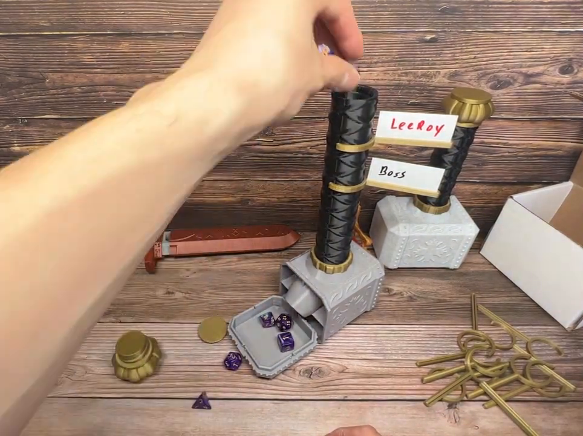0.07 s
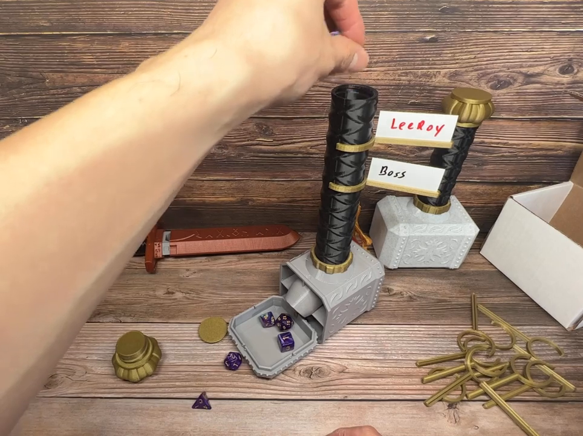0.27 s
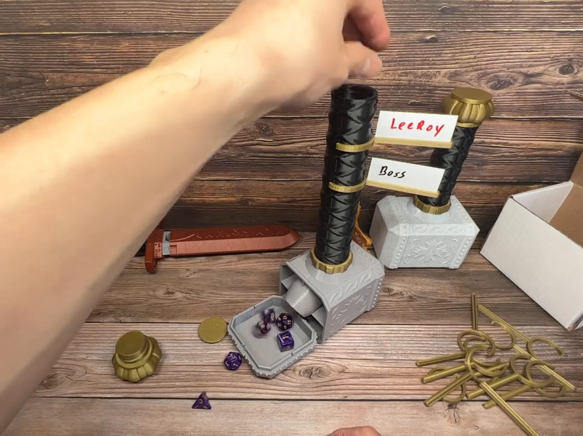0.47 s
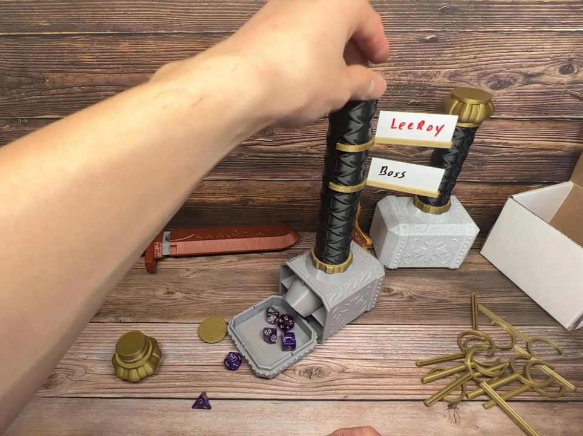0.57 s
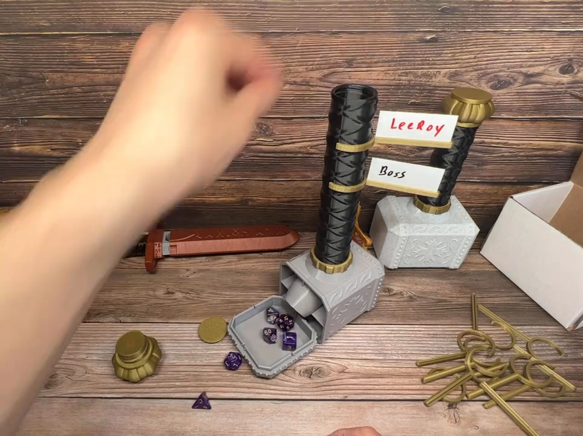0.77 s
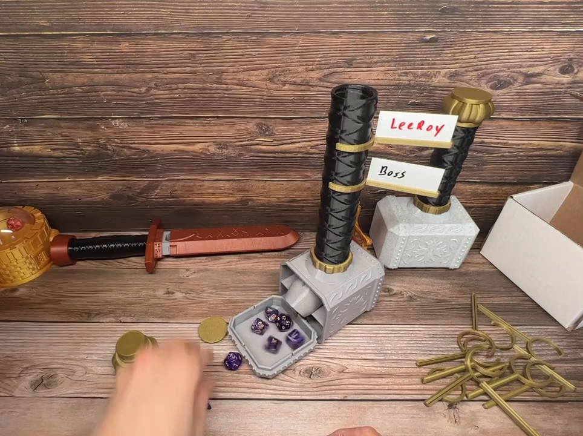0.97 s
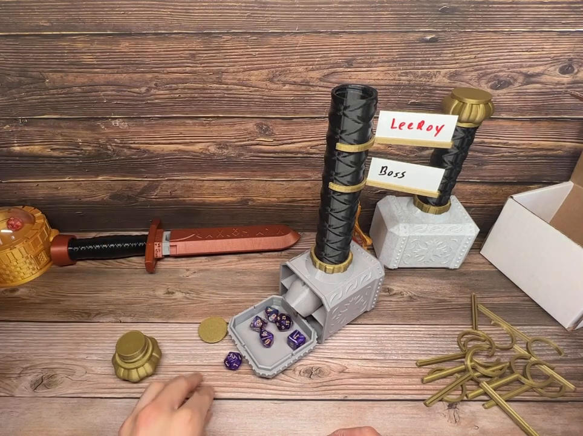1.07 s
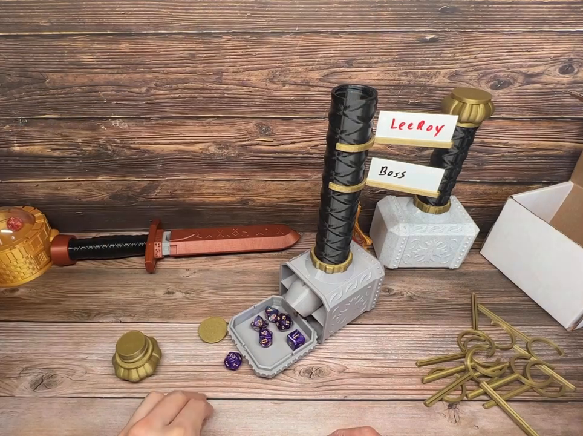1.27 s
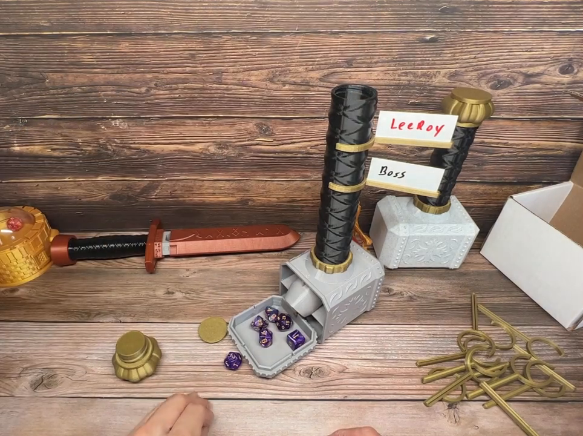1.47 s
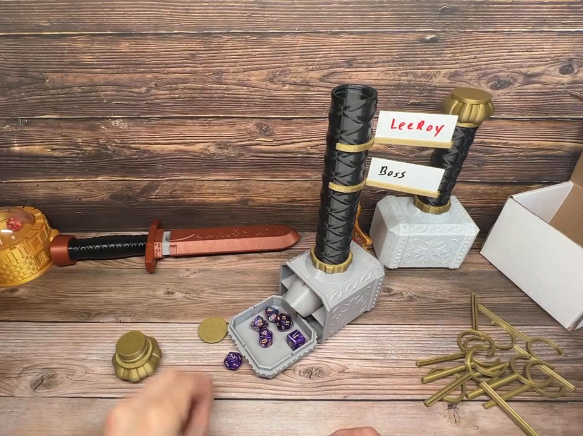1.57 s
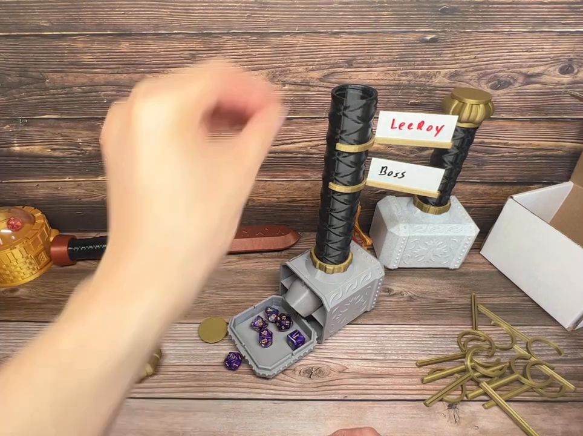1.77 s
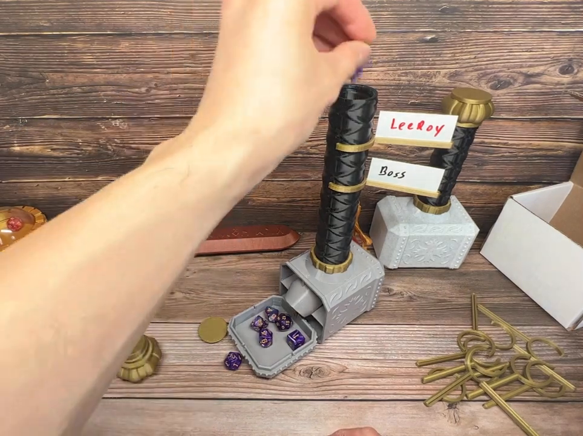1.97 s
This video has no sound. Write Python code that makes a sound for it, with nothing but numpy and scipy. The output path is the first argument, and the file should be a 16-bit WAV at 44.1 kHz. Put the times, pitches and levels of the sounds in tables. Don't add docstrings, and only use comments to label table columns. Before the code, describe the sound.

Hard plastic dice drop through a hollow plastic tower: a light first rattle, then two louder sharp clatters, each bouncing and tumbling into the tray; faint motor hum, small furnished room, close stereo microphone.

```python
import sys
import numpy as np
from scipy import signal
from scipy.fft import rfft, irfft, next_fast_len
from scipy.io import wavfile
from scipy.ndimage import uniform_filter1d, map_coordinates

SR = 44100
rng = np.random.default_rng(int(sys.argv[2]) if len(sys.argv) > 2 else 0)


def put_to_file(sound):
    columns = np.atleast_2d(sound).T
    safe = np.clip(columns, -1, 1)
    whole_steps = np.round(safe * 32767)
    wavfile.write(sys.argv[1], SR, whole_steps.astype(np.int16))


def gain_from_db(level_db):
    decades = np.asarray(level_db, float) / 20
    return 10 ** decades


N = 88200


def unit(x):
    return x / np.sqrt(np.mean(x ** 2) + 1e-20)


def peak(x):
    return x / np.abs(x).max()


def along(points, hz):
    f, value = np.transpose(points)
    return np.interp(np.log(hz + 1), np.log(f + 1), value)


def stretches(curves):
    t = np.arange(N) / SR
    gain = sum(gain_from_db(np.interp(t, *np.transpose(curve), left=-150, right=-150)) for curve in curves)
    return uniform_filter1d(gain, size=900, mode="nearest")


def wobble(rate):
    knots = rng.standard_normal(int(N * rate / SR) + 4)
    return map_coordinates(knots, [np.arange(N) * rate / SR])


def filtered(x, response):
    m = next_fast_len(x.shape[-1] + 8192)
    return irfft(rfft(x, m) * response(np.fft.rfftfreq(m, 1 / SR)), m)[..., :x.shape[-1]]


def resonance(f, hz, width_hz):
    return 1j * f * width_hz / (hz * hz - f * f + 1j * f * width_hz)


def body(modes):
    return lambda f: sum((-1) ** k * gain_from_db(db) * resonance(f, hz, width)
                         for k, (hz, width, db) in enumerate(modes))


# pitch_hz, likeness (0 to 1)
LIKENESS = [(150, 0.92), (400, 0.36), (1000, 0), (4000, 0.0044)]


def rush(spectrum):
    def mid_side_gain(hz):
        turn = np.arccos(np.clip(along(LIKENESS, hz), -1, 1)) / 2
        return gain_from_db(along(spectrum, hz)) * [np.cos(turn), np.sin(turn)]

    mid, side = filtered(rng.standard_normal((2, N)), mid_side_gain)
    return unit(np.array([mid + side, mid - side]))


# pitch_hz, level_db (per Hz)
RUMBLE_COLOUR = [(15, -35), (25, -11), (54, 6), (75, -16), (194, 1), (224, -10), (460, -10.5), (600, -35.5),
                 (780, -57), (1320, -120)]
# pitch_hz, level_db (per Hz)
AIR_COLOUR = [(400, -34.5), (550, 4.5), (1000, -2), (2200, -10), (9000, -21), (12500, -48), (16000, -63.5)]


def room_noise():
    return gain_from_db(-53.5) * rush(RUMBLE_COLOUR) + gain_from_db(-63) * rush(AIR_COLOUR)


# pitch_hz, width_hz, level_db
MOTOR_TONES = [(47, 5.8, 1.5), (144.6, 23, -1), (179, 18, 1.5), (282, 33, -8.5), (479, 10, -4.5)]


def motor():
    def tones(f):
        return np.abs(sum(body([tone])(f) ** 2 * gain_from_db(-tone[2]) for tone in MOTOR_TONES))

    return gain_from_db(-55.5) * unit(filtered(rng.standard_normal(N), tones))


# time_s, level_db
SLEEVE_MOVES = [
    [(0, -69), (.17, -71.5), (.36, -59)],
    [(.7, -88), (.83, -60.5)],
    [(1.4, -99), (1.53, -87.5), (1.58, -70), (1.63, -90.5), (1.74, -83), (1.79, -69.5), (1.9, -68.5),
     (2, -70.5)],
]
# pitch_hz, level_db (per Hz)
CLOTH_COLOUR = [(1200, -14.5), (2000, -6), (7000, -5), (11000, -20), (14000, -54.5)]


def sleeve():
    return stretches(SLEEVE_MOVES) * gain_from_db(5.0 + 1.2 * wobble(34)) * rush(CLOTH_COLOUR)


def hand():
    start_s, soft_s, pitch_hz = 1.165, 0.016, 51.6
    u = np.maximum(np.arange(N) / SR - start_s, 0) / soft_s
    return gain_from_db(-43) * u * np.exp(1 - u) * np.sin(2 * np.pi * pitch_hz * soft_s * u)


# pitch_hz, die_away_s (to -60 dB)
LINGER = [(200, 0.24), (1500, 0.34), (5000, 0.16), (9000, 0.23), (12000, 0.087)]
# delay_s, level_db
NEAR_ECHOES = [
    (.0037, -24),
    (.0082, -20),
    (.0121, -32.5),
]
TAIL_TIMES_S = [0, .19, .3, .38, .45, .48, .56, .84, .875, .95, .97, .99, 1.06, 1.13, 2]


def room(x):
    out = np.zeros((2, N + SR))
    edges = np.round(np.array(TAIL_TIMES_S) * SR).astype(int)
    for start, end in zip(edges[:-1], edges[1:]):
        hz, t, z = signal.stft(rng.standard_normal((2, SR // 2)), SR, nperseg=256)
        apart = (hz / (hz + 200))[:, None] ** 2
        z = np.array([z[0] + apart * z[1], z[0] - apart * z[1]]) / np.sqrt(1 + apart ** 2)
        fade = gain_from_db(-60 * t / along(LINGER, hz)[:, None])
        tail = signal.istft(z * fade, SR, nperseg=256)[1]
        tail = gain_from_db(-10.5) * np.pad(tail / np.linalg.norm(tail[0]), ((0, 0), (150, 0)))
        for k, (delay_s, db) in enumerate(NEAR_ECHOES):
            left = round(delay_s * SR)
            tail[[0, 1], [left, left + (-1) ** k * 9]] += gain_from_db(db)
        wet = signal.fftconvolve(x.mean(0)[None, start:end], tail, axes=1)
        out[:, start:start + wet.shape[1]] += wet
    return out[:, :N]


# time_s, level_db
SKIDS = [
    [(.375, -31), (.42, -35), (.47, -40)],
    [(.835, -40), (.9, -43), (.96, -38.5)],
]
# time_s, level_db
TUMBLES = [
    [(.49, -43), (.55, -44), (.6, -42), (.655, -44), (.69, -58), (.76, -68)],
    [(.98, -28), (1.05, -46.5), (1.12, -38), (1.17, -44.5), (1.22, -62), (1.3, -68.5)],
]
# pitch_hz, level_db (per Hz)
TUMBLE_COLOUR = [(290, -30.5), (500, -1), (1080, 5), (1280, -10), (1770, 3), (3200, -5), (3810, -5),
                 (6230, -2), (16000, -49)]
# pitch_hz, width_hz, level_db
TRAY_SHELL = [(1495, 100, -3), (1790, 130, -5), (2170, 110, -5.5), (2420, 58, -3), (2800, 200, -8),
              (3200, 180, -1), (3600, 250, -5.5)]
# pitch_hz, width_hz, level_db
TRAY_AIR = [(640, 76, -1.5), (870, 200, 6.5), (1139, 82, 1)]
# pitch_hz, width_hz, level_db
TRAY_BOOM = [(128, 38, -12), (201, 24, 5.5), (292, 52, 0.5), (416, 64, -6)]


def rolling():
    size = gain_from_db(np.minimum(4 * rng.exponential(size=N), 11))
    happens = rng.random(N) < 1200 / SR
    contacts = size * happens * np.sign(rng.standard_normal(N))
    grains = unit(contacts * gain_from_db(1.9 * wobble(78))) + 0.54 * rng.standard_normal((2, N))

    def tray(f):
        ringing = 1 + 0.23 * body(TRAY_SHELL)(f) + 0.49 * body(TRAY_AIR)(f)
        return gain_from_db(along(TUMBLE_COLOUR, f)) * ringing

    def baffle(f):
        return body([(5000, 2500, 0), (2300, 1400, -2.5), (1100, 350, -3)])(f) / (1 + (f / 7000) ** 4)

    tone = unit(filtered(grains, tray))
    rumble = unit(filtered(grains[0], lambda f: body(TRAY_BOOM)(f) / (1 + 1j * f / 450) ** 2))
    skid = unit(filtered(grains, baffle))
    return (tone + gain_from_db(-6.5) * rumble) * stretches(TUMBLES) + skid * stretches(SKIDS)


# pitch_hz, level_db (per Hz)
DIE_CLICK = [(2060, -18.5), (3500, -11.5), (4340, -1.5), (6400, -0.5), (10300, -9.5), (11800, -8),
             (13800, -33.5), (15400, -15), (16500, -33.5)]


def knocks(hits, walls, hollow, table, scrape_s, width_hz, rough, ring_db, click_db, thud_db, boom_db):
    click_first_s, stiff_hz = .0007, 1300
    edge_noise = .06
    out, t = np.zeros((2, N + SR)), np.arange(SR // 5) / SR
    sides = np.array([[1], [-1]])

    def late(x):
        return np.roll(x, round(click_first_s * SR), axis=-1)

    def stiff(f):
        return (f * f / (f * f - stiff_hz ** 2 - 1j * f * stiff_hz)) ** 2

    def heard(modes, luck):
        def response(f):
            total = 0
            for k, ((hz, width, db), (tune, gain, lean, phase)) in enumerate(zip(modes, luck)):
                mode = body([(hz * (1 + .006 * tune), width, db + 1.5 * gain)])(f) * (-1) ** k
                total = total + mode * gain_from_db(2.3 * lean * sides) * np.exp(.2j * phase * sides)
            return total
        return response

    for start_s, db, hz, bright_db, low_db in hits:
        chance, luck = rng.standard_normal((3, len(t))), rng.standard_normal((14, 4))
        scrape = np.exp(-(t / scrape_s) ** 4) + .12 * np.exp(-t / .006)
        shape = (1 - np.exp(-t / 0.00095)) * scrape
        swing = shape * (np.sin(2 * np.pi * hz * t) + rough * chance[0])
        wall = peak(filtered(late(swing), lambda f: body([(hz, width_hz, 0)])(f) ** 2 * stiff(f)))
        blow = (t == 0) + edge_noise * rough * chance[0] * shape
        shell = peak(filtered(
            late(blow), lambda f: heard(walls, luck)(f) * body([(hz, 1700, 0)])(f) * stiff(f)))
        fizz = chance[1:] * shape * np.minimum(t / 0.0056, 1)
        click = peak(filtered(fizz, lambda f: gain_from_db(along(DIE_CLICK, f))))
        thud = peak(filtered(late(shape * np.exp(-t / 0.00052)), heard(hollow, luck)))
        push = np.roll(t * np.exp(-t / 0.00046), round(.003 * SR))
        boom = peak(filtered(push, body(table)))
        hit = peak(wall + gain_from_db(ring_db) * shell)
        hit = hit + gain_from_db(low_db + thud_db) * thud + gain_from_db(boom_db) * boom
        hit = hit + gain_from_db(bright_db + click_db) * (click[0] + 0.3 * click[1] * sides)
        start = round((start_s - click_first_s) * SR)
        out[:, start:start + len(t)] += gain_from_db(db) * hit
    return out[:, :N]


# start_s, level_db (peak), pitch_hz (wall), click_db, thud_db (both over the knock)
TRAY_BOUNCES = [(0.4718, -11, 2170, -12.5, -6.5), (0.4852, -15, 1800, -9.5, -13),
                (0.4862, -6, 3190, -13, -15), (0.5472, -30.5, 4000, 2.5, -30),
                (0.5771, -22, 4970, -8.5, -17), (0.5962, -28.5, 3270, -6.5, -2),
                (0.6258, -31, 1810, -7, -22.5), (0.6436, -31, 1680, -11, -28),
                (0.9636, -9.5, 3090, -12.5, -6.5), (0.9752, -10, 2587, -12, -18),
                (0.9958, -16.5, 2430, -9, -47), (1.0359, -35, 1540, 0.5, -88), (1.074, -24.5, 2570, -8, -7),
                (1.0771, -24, 3320, -7, -3), (1.1045, -47, 2080, -12, -20), (1.1172, -30, 1800, -9.5, -3),
                (1.1372, -47, 3200, -30, -20), (1.1815, -37.5, 1670, -26, -15),
                (1.1297, -32.5, 2290, -35, -11), (1.1466, -27, 2440, -17, -6.5),
                (1.1584, -31.5, 1480, -12, -8.5)]
LAST_TICK = [
    (1.2072, -40.5, 1480, -31.5, -9.5),
]
# pitch_hz, width_hz, level_db
TICK_SHELL = [(1466, 31, -5), (1820, 34, 0)]
# pitch_hz, width_hz, level_db
TICK_AIR = [(1125, 26, 0)]


def landing():
    bounces = knocks(TRAY_BOUNCES, TRAY_SHELL, TRAY_AIR, TRAY_BOOM, scrape_s=0.005, width_hz=1300,
                     rough=1.15, ring_db=4, click_db=9.0, thud_db=-1.0, boom_db=-23.5)
    tick = knocks(LAST_TICK, TICK_SHELL, TICK_AIR, TRAY_BOOM, scrape_s=0.0061, width_hz=450,
                  rough=.1, ring_db=1, click_db=5, thud_db=3.5, boom_db=-25)
    return bounces + tick


# start_s, level_db, pitch_hz, click_db, thud_db
FIRST_DIE = [(0.1768, -19.5, 2800, -20.5, -10.5), (0.1982, -18, 2287, -15.5, -15.5),
             (0.2012, -14, 1850, -28.5, -16), (0.2134, -19.5, 1800, -25.5, -11),
             (0.2262, -22, 1800, -15, -15.5), (0.2317, -33.5, 1800, -30, -15.5),
             (0.2770, -25, 2100, -10, -17)]
# start_s, level_db, pitch_hz, click_db, thud_db
SECOND_DIE = [(0.3691, -9, 3494, -19, -41), (0.3765, -19, 1800, -23.5, -30),
              (0.3961, -15.5, 2440, -36, -14), (0.4070, -16, 2470, -28.5, -22),
              (0.4136, -23, 1875, -8.5, -12)]
# start_s, level_db, pitch_hz, click_db, thud_db
LAST_DIE = [(0.8318, -9.5, 1870, -18.5, -29.5), (0.8371, -19.5, 1800, -30, -16.5),
            (0.8474, -15, 2550, -28.5, -18), (0.8527, -17.5, 2320, -30, -10.5),
            (0.8598, -8.5, 2280, -16, -20.5), (0.8622, -8.5, 1800, -13, -16),
            (0.8670, -13.5, 2300, -27.5, -12), (0.8802, -11.5, 2930, -5.5, -19),
            (0.8838, -12.5, 3240, -18, -9), (0.8903, -16.5, 2310, -16.5, -13.5),
            (0.9167, -14, 1765, -4, -15)]
# start_s, level_db, pitch_hz, click_db, thud_db
MOUTH_BLOWS = [
    (0.3665, -0.12, 1869, -15, -38),
    (0.8271, 0.58, 1945, -24.5, -28.5),
]
# start_s, level_db, pitch_hz, click_db, thud_db
BAFFLE_BLOW = [
    (0.3853, -1.1, 2616, -29, -25),
]
# pitch_hz, width_hz, level_db
LIGHT_SHELL = [(1510, 130, -7), (1817, 50, 1), (2080, 46, -5.5), (2430, 85, -4.5), (2800, 150, -7),
               (3320, 200, -10.5)]
# pitch_hz, width_hz, level_db
TOWER_SHELL = [(1480, 120, 2.5), (1800, 44, -1.5), (2050, 91, -4), (2470, 390, -5), (2620, 54, 0),
               (3200, 240, -6.5), (3222, 100, -9), (3620, 420, -10.5)]
# pitch_hz, width_hz, level_db
MOUTH_SHELL = [(1480, 140, -3), (1800, 100, 4.5), (2194, 170, -1.5), (2412, 150, -2), (2960, 120, -2),
               (3364, 150, 0.5), (3560, 71, -8)]
# pitch_hz, width_hz, level_db
FIRST_AIR = [(730, 90, -1), (1100, 39, -3)]
# pitch_hz, width_hz, level_db
TOWER_AIR = [(669, 16, 17), (726, 83, -1), (800, 30, -1), (1080, 79, -0.5)]
# pitch_hz, width_hz, level_db
LAST_AIR = [(678, 20, 3.5), (900, 230, -9.5), (1176.4, 41, 9)]
# pitch_hz, width_hz, level_db
TOWER_BOOM = [(70, 13, -11.5), (134.5, 12, 1), (212.4, 13, 5), (347, 90, -10)]


def falling():
    dice = [(FIRST_DIE, LIGHT_SHELL, FIRST_AIR), (SECOND_DIE, TOWER_SHELL, TOWER_AIR),
            (LAST_DIE, TOWER_SHELL, LAST_AIR)]
    tumbling = sum(knocks(hits, walls, hollow, TOWER_BOOM, scrape_s=0.0033, width_hz=1500,
                          rough=1.0, ring_db=6, click_db=6.5, thud_db=4, boom_db=-23.0)
                   for hits, walls, hollow in dice)
    mouth = knocks(MOUTH_BLOWS, MOUTH_SHELL, TOWER_AIR, TOWER_BOOM, scrape_s=0.002, width_hz=770,
                   rough=.15, ring_db=17, click_db=7, thud_db=-1, boom_db=-24.5)
    baffle = knocks(BAFFLE_BLOW, TOWER_SHELL, TOWER_AIR, TOWER_BOOM, scrape_s=0.002, width_hz=2200,
                    rough=0.12, ring_db=-3.5, click_db=9, thud_db=0, boom_db=-26)
    return tumbling + mouth + baffle


# pitch_hz, level_db (left over right)
LEFT_LEAN = [(500, 0), (2000, 2.5), (3500, 1.5), (5000, 8.5), (7000, 4.5), (9000, 1), (13000, -1.5)]


def scene():
    lead_s = .0001
    side = np.array([[.5], [-.5]])

    def ports(f):
        delay = f * side * lead_s / (1 + (f / 6000) ** 2)
        return gain_from_db(side * along(LEFT_LEAN, f)) * np.exp(2j * np.pi * delay)

    dice = falling() + landing() + rolling()
    dice_in_room = filtered(dice + room(dice), ports)
    background = motor() + sleeve() + hand() + room_noise()
    return dice_in_room + background


def top_cut(x):
    return signal.sosfilt(signal.butter(12, 17010, fs=SR, output="sos"), x)


def record(dry):
    low_hz, top_hz = 38, 16100
    held = dry / (1 + np.abs(dry / .97) ** 6) ** (1 / 6)
    mix = filtered(held, lambda f: (f / (f - 1j * low_hz)) ** 2 / (1 + (f / top_hz) ** 60))
    return top_cut(mix)


dry = scene()
out = record(dry)
put_to_file(out)
```